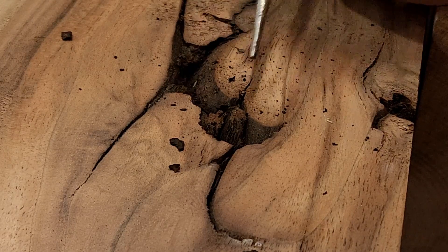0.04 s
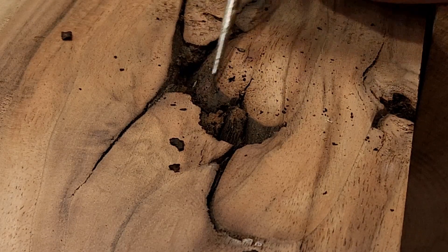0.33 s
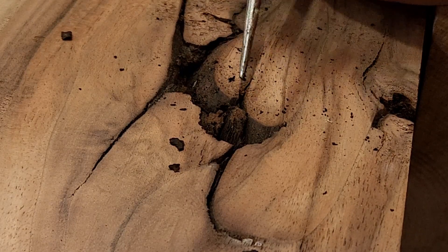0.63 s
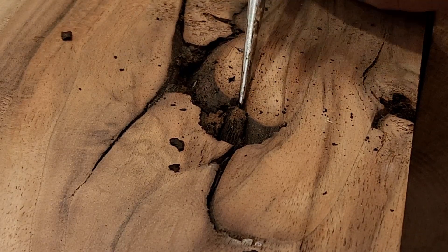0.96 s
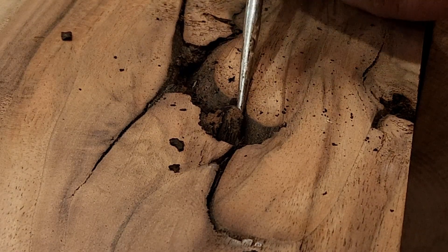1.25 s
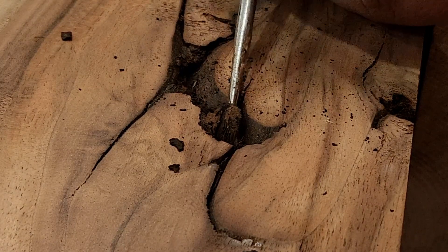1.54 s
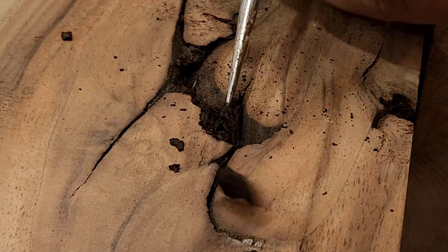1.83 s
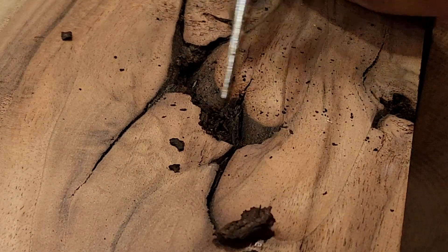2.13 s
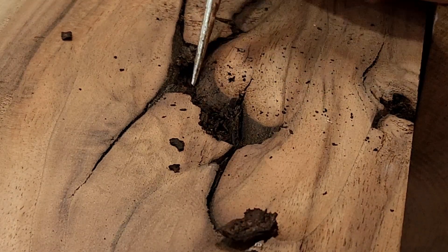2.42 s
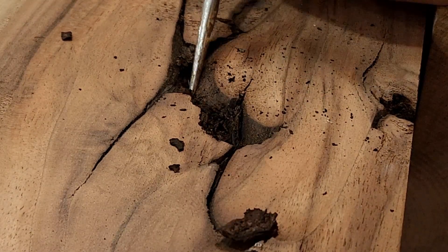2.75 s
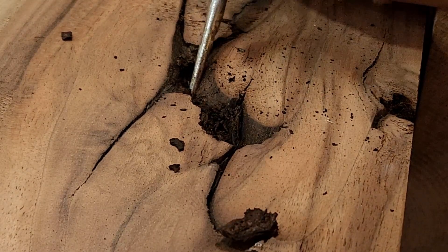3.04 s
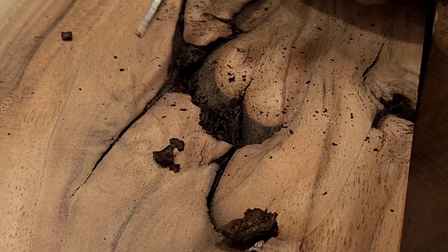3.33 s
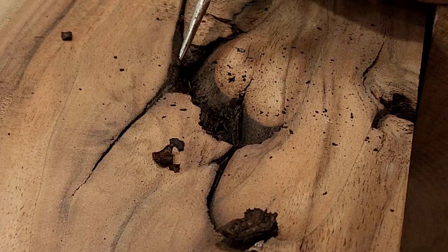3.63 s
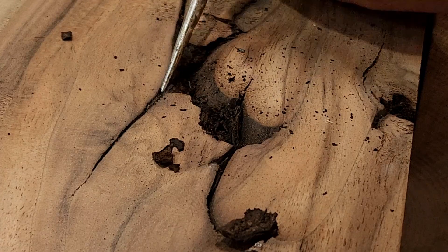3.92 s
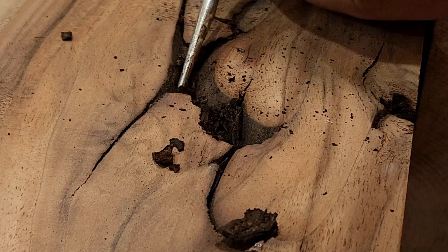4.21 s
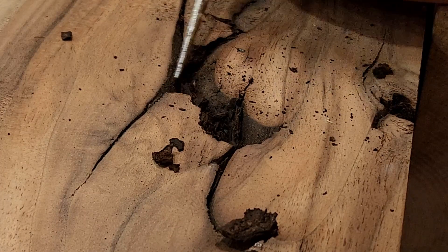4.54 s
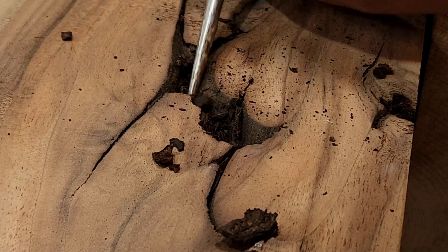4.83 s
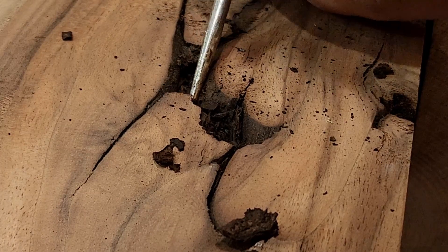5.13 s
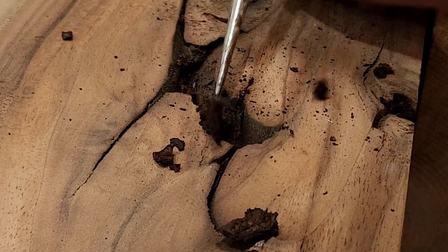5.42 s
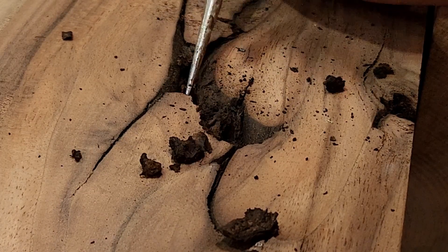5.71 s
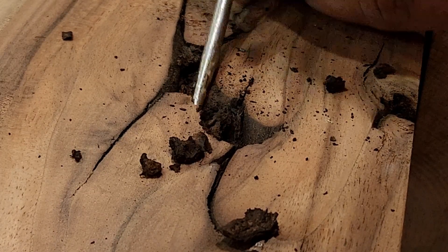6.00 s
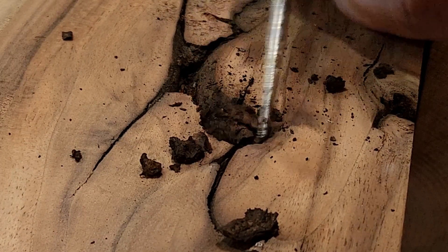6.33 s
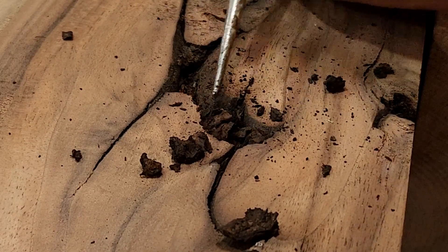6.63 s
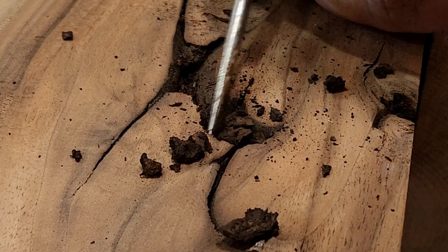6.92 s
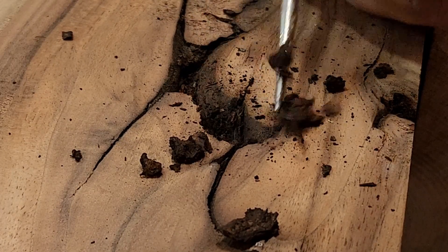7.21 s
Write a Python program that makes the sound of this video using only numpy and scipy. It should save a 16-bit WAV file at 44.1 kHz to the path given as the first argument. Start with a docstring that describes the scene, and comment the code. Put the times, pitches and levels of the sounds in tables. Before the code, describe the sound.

Dry, brittle cracks and faint gritty scraping as a metal point picks bark from wood in a quiet workshop.

```python
"""A small, quiet workshop, where a steel pick pries crumbly bark from a knot hole in a wooden slab.
Each snap is a burst of tiny fractures that excites the resonances of pick and slab; strong ones rock the
slab on its bench. Chips ring, crumbs tick, and the steel clacks and squeaks on sound wood. Between snaps
the point scratches through the bark. A close stereo microphone hears this with the room's reflections."""
import sys
import numpy as np
from scipy import signal
from scipy.fft import rfft, irfft
from scipy.io import wavfile
from scipy.ndimage import uniform_filter1d

SR = 44100
rng = np.random.default_rng(int(sys.argv[2]) if len(sys.argv) > 2 else 0)


def generate_wav(signal):
    """Clip the signal to [-1, 1] and save it as 16-bit WAV at the path in sys.argv[1]."""
    frames = np.transpose(np.atleast_2d(signal))
    scaled = np.clip(frames, -1, 1) * 32767
    pcm = np.round(scaled).astype(np.int16)
    wavfile.write(sys.argv[1], SR, pcm)


N = 324576
HIT_SIZE, ATTACK_SIZE = 16384, 882  # samples in one hit and in its first 20 ms
AGE = np.arange(HIT_SIZE) / SR  # seconds since a hit began

# Bark snapping. Each row: start in seconds, fracture time in seconds, crack level in dB,
# then ring of the pick and fizz, both in dB relative to the crack.
SNAPS = [(.075, 0.0013, -22.5, -10, -6.5), (1.2438, .0008, -36.5, -16, -22.5),
         (1.413, 0.012, -52.5, -2, -15), (1.8164, 0.0027, -32, -1, 2.5), (2.7672, .0026, -56.5, -3, 4.5),
         (3.2177, 0.0039, -29, -5.5, -1), (3.8414, 0.0073, -47, 6, -12),
         (4.0976, 0.00039, -31.5, -3.5, -8.5), (4.1277, .0027, -44, 1.5, -10),
         (4.2454, 0.0017, -21, -8.5, -6.5), (4.392, 0.00088, -62, -1.5, 8), (4.445, 0.0079, -26, 2, -9.5),
         (4.4894, 0.0006, -38.5, 3.5, -10), (5.3553, .001, -54.5, -18, 3.5), (5.3846, .002, -47, -4.5, 4),
         (5.408, 0.0062, -40.5, -11, -4), (5.4224, 0.0013, -36, -4, -4), (5.431, 0.0091, -25, -4, -3),
         (5.478, 0.00085, -25, -10, -3), (5.8463, 0.0068, -40.5, -0.5, -6.5),
         (5.8785, 0.0016, -42, 1.5, -18), (6.083, 0.0049, -36.5, -12.5, 0.5),
         (6.0882, 0.0017, -34, -8, -15), (6.1984, 0.0036, -34, -5, -9.5), (6.33, 0.00027, -50.5, -13, -2),
         (6.384, 0.011, -36, -4.5, 1), (6.4148, .0005, -26.5, -6.5, -5), (6.423, 0.011, -28.5, -1.5, -10.5),
         (7.136, 0.021, -35, -2.5, -9), (7.1727, 0.00033, -43, 4, -2), (7.245, 0.0089, -47, 12, 4.5),
         (7.27, .009, -36, -3, -5.5)]
# Jolts of the slab. Each row: start in seconds, then relative levels of ring, sway and bounce in dB.
JOLTS = [(0.075, -34.5, -35.5, -32), (1.315, -59, -51.5, -34), (1.526, -54.5, -60, -50.5),
         (1.818, -32, -37, -41), (3.219, -31.5, -34.5, -40), (3.844, -45.5, -67.5, -71),
         (4.099, -40, -51, -53), (4.246, -34, -67, -50.5), (4.447, -36.5, -30.5, -32),
         (4.933, -56.5, -43.5, -44.5), (5.434, -40, -35, -37.5), (5.478, -37.5, -28.5, -44),
         (5.848, -47.5, -29.5, -45), (6.195, -49, -39, -50.5), (6.42, -44, -38.5, -37.5),
         (7.269, -44.5, -59.5, -44.5)]
# Steel knocking on sound wood; the row at 1.31 s is instead the sharp click of the slab bumping its bench. Each
# row: start in seconds, level in dB, pitch in Hz, left minus right in dB, click level in dB, roughness from 0
# to 1.
CLACKS = [(0.6214, -37, 1764, -1.5, -42, 0.53), (1.3143, -35, 2100, 2.5, -46.5, .9),
          (1.5262, -42.5, 1428, 5.5, -43.5, 0.55), (3.8439, -38.5, 1410, 11.5, -65.5, 0.3),
          (4.245, -15.5, 1342, 10.5, -42, 0.22)]
# Hard chips breaking free or landing. Each row: start in seconds, level in dB, pitch in Hz.
CHIPS = [(1.8182, -23.5, 4940), (1.832, -39, 4950), (1.9003, -37.5, 3700), (1.978, -42, 3840),
         (3.219, -29, 5400), (4.246, -28.5, 5430), (5.477, -24.5, 5270)]
# Dull bumps of slab and hand. Each row: start in seconds, level in dB, lower and upper band edge in Hz,
# 60 dB decay time in seconds.
BUMPS = [(1.088, -63.5, 985, 1420, 0.086), (1.311, -31.5, 200, 2630, 0.067),
         (1.315, -39.5, 133.6, 865, 0.34), (2.628, -53, 208, 423, 0.33)]
# Drags of the point. Each row: start and length in seconds, grit level in dB, ring in dB above the grit.
STROKES = [(0.593, 0.052, -46.5, -10), (1.12, 0.19, -62.5, -2.5), (2.313, 0.12, -61.5, 3),
           (2.501, 0.048, -49, -21), (2.584, 0.084, -66, 2.5), (2.747, 0.1, -52.5, -2.5),
           (3.045, 0.093, -66, 3.5), (3.145, 0.05, -55, -10), (3.791, 0.076, -56.5, 7),
           (4.346, 0.089, -55.5, -18), (4.743, 0.038, -44, 0.5), (4.828, 0.18, -51.5, -2),
           (5.319, .095, -48.5, -10), (5.965, 0.15, -47, -3.5), (6.14, 0.037, -41.5, -7),
           (6.804, 0.047, -40, -1), (6.846, 0.043, -44, -8), (6.92, 0.098, -45.5, -1),
           (7.037, 0.067, -58, 2.5), (7.203, 0.068, -42.5, 5.5), (7.287, .09, -74, 11)]
# Steel chafing on sound wood. Each row: start and length in seconds, level in dB, pitch in Hz.
SQUEAKS = [(5.781, 0.3, -59, 1783), (5.96, 0.081, -70, 1430), (6.933, 0.27, -54, 1800),
           (7.177, 0.12, -57, 1760)]
# Modes of the slab. Each row: frequency in Hz, level in dB, 60 dB decay time in seconds.
SLAB_MODES = [(176, -14, 0.19), (232, -17, 0.22), (290.6, -6, .14), (340, -16.5, 0.19), (435.5, -9, 0.16),
              (512.7, 2.5, 0.085), (572.3, -7, 0.11), (659, -14, 0.14)]
# Resonances of the firmly braced pick and bending modes of its steel shaft.
# Each row: frequency in Hz, width in Hz, peak height in dB.
BRACED_PEAKS = [(936, 87, 16), (1082, 27, 8), (1202, 81, 11.5), (1454.6, 120, 20.5), (1540, 21, 9)]
SHAFT_PEAKS = [(2980, 390, 6), (3990, 71, 6.5), (5100, 110, -1), (6650, 110, 3)]
# Spectra of the braced pick, cracking bark, fizzing fine fibres, scratched grit, crumbs and room tone.
# Each row: frequency in Hz, relative spectral density in dB.
BRACED_SPECTRUM = [(150, -20), (450, -3), (800, -8.5), (1100, -1), (1500, -3.5), (2100, 3.5), (3000, -23),
                   (8000, -39.5)]
CRACK_SPECTRUM = [(300, -40), (900, -13), (2000, 2.5), (2900, -5.5), (3600, -4), (4500, -1.5), (5500, 3.5),
                  (6600, -4.5), (8000, -14), (10500, -37.5), (16000, -36)]
FIZZ_SPECTRUM = [(2000, -38), (6000, -18), (8300, -7), (10000, -4.5), (12000, -4.5), (15000, -4.5),
                 (17000, -5.5)]
GRIT_SPECTRUM = [(200, -8.5), (600, -34), (1500, -5.5), (2200, -4.5), (3000, 1), (4300, 6.5), (5500, 8),
                 (7000, -3), (9000, -8), (12000, -14), (16000, -11.5)]
CRUMB_SPECTRUM = [(500, -17), (2000, -1.5), (5000, 0), (9000, -6.5), (16000, -10.5)]
ROOM_TONE_SPECTRUM = [(12, -42), (20, -6), (44, -7.5), (113, -23), (193, -33.5), (222, -34), (399, -29),
                      (459, -33), (678, -30.5), (1060, -33), (1910, -32), (2390, -35), (7520, -45.5),
                      (9670, -58), (16000, -51.5)]
# Level difference of the direct sound. Each row: frequency in Hz, left minus right in dB.
LEFT_BIAS = [(40, 4.5), (250, 3), (600, .5), (1300, 4), (2200, 0), (5000, -.5), (9000, 1.5), (14000, 4.5)]
# Reverberation time. Each row: frequency in Hz, 60 dB decay time in seconds.
ROOM_T60 = [(100, 0.85), (400, 0.59), (1400, 0.52), (2700, 0.43), (5500, .3), (10000, 0.22), (16000, 0.19)]
# Colour of the reverberant tail. Each row: frequency in Hz, relative gain in dB.
ROOM_COLOUR = [(60, -13), (250, -2), (600, -7), (1400, -2.5), (2600, -3.5), (4800, -11.5), (15000, 0)]


def snaps(slab_db=-25):
    """Brittle fracture: each burst cracks in the treble, rings the pick and faintly stirs the slab."""
    out = np.zeros((2, N))
    crack, fizz = colour(CRACK_SPECTRUM, SHAFT_PEAKS), colour(FIZZ_SPECTRUM)
    for start, length, crack_db, ring_db, fizz_db in SNAPS:
        burst = fracture(length)
        add(out, start, amp(crack_db + slab_db) * slab_ring(burst))
        for path, relative_db in [(braced_pick(), ring_db), (crack, 0), (fizz, fizz_db)]:
            gain = amp(crack_db + relative_db)
            add(out, start, gain * unit_attack(convolve(burst, path)))
            add(out, start - ATTACK_SIZE / SR, gain * convolve(lead_in(), path / np.linalg.norm(path)))
    return out * panned(db=2.5)


def fracture(length, crumble_db=-21, crumble_s=0.0045, rise_s=0.00066):
    """Acoustic emission: breaking fibres release a tight noise burst and a weaker crumbling."""
    breaking = (1 - np.exp(-AGE / rise_s)) * np.exp(-AGE / max(length, rise_s))
    crumbling = amp(crumble_db) * np.exp(-AGE / crumble_s)
    return stereo_noise(HIT_SIZE, correlation=0.67) * (breaking + crumbling)


def lead_in(level_db=-13, growth_s=0.0089):
    """Exponential onset: a faint 20 ms swell of noise leads into each snap."""
    swell = np.exp(-AGE[:ATTACK_SIZE] / growth_s)[::-1]
    return amp(level_db) * stereo_noise(ATTACK_SIZE, correlation=0.85) * swell


def braced_pick(firmness=0.6, contact_shift=0.05):
    """Boundary conditions: the contact point shifts the pick's resonances; soft bark flattens them."""
    shifts = np.exp(contact_shift * rng.standard_normal(len(BRACED_PEAKS)))
    peaks = [(hz * shift, width, firmness * db) for (hz, width, db), shift in zip(BRACED_PEAKS, shifts)]
    return colour(BRACED_SPECTRUM, peaks)


def slab_ring(burst, roughness=0.75):
    """Modal response: the push excites the slab cleanly, the breaking fibres roughly."""
    slab = modes(SLAB_MODES, spread_db=2, detune=0.0034)
    return unit_attack(unit_attack(slab) + roughness * unit_attack(convolve(burst, slab)))


def jolts(sway_hz=41, bounce_hz=92, sway_t60=0.42, bounce_t60=0.3, rise_s=0.011):
    """Free vibration: the wood rings at once, then slab and bench swing in two low modes and shudder."""
    out = np.zeros((2, N))
    build_up = 1 - np.exp(-AGE / rise_s)
    for start, ring_db, sway_db, bounce_db in JOLTS:
        add(out, start, amp(ring_db) * slab_ring(fracture(length=0.002)) * panned(db=1.95))
        sway = modes([(sway_hz, 0, sway_t60)], spread_db=1, detune=0.029)
        rumble = band(stereo_noise(HIT_SIZE, correlation=0.87), low_hz=53, high_hz=156)
        shudder = unit_rms(rumble) * amp(-60 * AGE / bounce_t60)
        bounce = modes([(bounce_hz, 0, bounce_t60)], spread_db=3, detune=0.033)
        rocking = 2 * amp(sway_db) * sway + amp(bounce_db) * (1.84 * bounce + 0.42 * shudder)
        add(out, start, rocking * build_up * panned(db=1.7))
    return out


def clacks(split=0.085, t60=0.033, rise_s=0.0012, band_ratio=1.57):
    """Beating: two close modes interfere under a brief click; a glancing blow blurs them into noise."""
    out = np.zeros((2, N))
    for start, db, hz, pan_db, click_db, roughness in CLACKS:
        burst = fracture(length=0.0025)
        pair = modes([(hz * (1 - split), 0, t60), (hz * (1 + split), 0, t60)], spread_db=6, detune=0.0061)
        tone = unit_attack(pair * (1 - np.exp(-AGE / rise_s)))
        blur = unit_attack(band(burst, hz / band_ratio, hz * band_ratio))
        knock = unit_attack((1 - roughness) * tone + roughness * blur)
        click = unit_attack(convolve(burst, colour(GRIT_SPECTRUM, SHAFT_PEAKS)))
        add(out, start, (amp(db) * knock + amp(click_db) * click) * panned(pan_db))
    return out


def chips(band_ratio=1.19):
    """Damped resonance: a short fracture excites the broad peak of a small, hard chip."""
    out = np.zeros((2, N))
    for start, db, hz in CHIPS:
        ring = band(fracture(length=0.0018), hz / band_ratio, hz * band_ratio)
        add(out, start, amp(db) * unit_attack(ring))
    return out * panned(db=0.5)


def bumps(rise_s=0.0038):
    """Modal overlap: a soft blow excites so many close modes that they merge into a band of noise."""
    out = np.zeros((2, N))
    for start, db, low_hz, high_hz, t60 in BUMPS:
        envelope = (1 - np.exp(-AGE / rise_s)) * amp(-60 * AGE / t60)
        blow = stereo_noise(HIT_SIZE, correlation=0.66) * envelope
        add(out, start, amp(db) * unit_attack(band(blow, low_hz, high_hz, order=4)))
    return out


def scratching(grains_per_s=900, grain_s=0.00024, rub=0.6, ring_boost_db=1.1):
    """Shot noise: the dragged point breaks a random stream of tiny grains, which excite the pick."""
    levels = np.zeros((2, N))
    for start, length, grit_db, ring_db in STROKES:
        add(levels, start, amp([[grit_db], [grit_db + ring_db + ring_boost_db]]) * pressure(length))
    grit_level, ring_level = levels
    breaks = rng.random(N) < grains_per_s / SR
    sizes_db = 3.5 * np.minimum(rng.exponential(1, N), 3.5)
    grain_envelope = signal.lfilter([1], [1, -np.exp(-1 / (grain_s * SR))], breaks * amp(sizes_db))
    grains = unit_rms(grain_envelope * stereo_noise(N, correlation=0.8))
    drive = (grains + rub * stereo_noise(N, correlation=0.4)) * catching()
    grit = grit_level * unit_rms(convolve(drive, colour(GRIT_SPECTRUM, SHAFT_PEAKS)))
    ring = ring_level * unit_rms(convolve(drive, colour(BRACED_SPECTRUM, BRACED_PEAKS)))
    return (grit + ring) * panned(db=2)


def pressure(length, attack_s=0.039, release_s=0.018, growth_db=0.5):
    """Contact force of a stroke: it builds smoothly, grows slightly, then relaxes exponentially."""
    bite = np.minimum(AGE / attack_s, 1) ** 2
    drag = amp(growth_db * np.minimum(AGE / length, 1))
    release = np.exp(-np.maximum(AGE - length, 0) / release_s)
    return bite * drag * release


def catching(depth_db=4, window=500):
    """Stick-slip friction: the drag swells and sags at random within hundredths of a second."""
    wander = uniform_filter1d(uniform_filter1d(rng.standard_normal(N), window), window // 2)
    return amp(depth_db * unit_rms(wander))


def crumbs(smallest_db=-41, range_db=8, delay_s=0.015, scatter_s=0.041, count=3):
    """Small impacts: loosened crumbs tick on the slab after each snap, in proportion to its crack."""
    out = np.zeros((2, N))
    for start, _, crack_db, _, _ in SNAPS:
        for wait, size in rng.random((count, 2)):
            gain = amp(crack_db + smallest_db + range_db * size)
            add(out, start + delay_s + scatter_s * wait, gain * unit_attack(fracture(length=0.0004)))
    path = colour(CRUMB_SPECTRUM)
    return convolve(out, path / np.linalg.norm(path))


def squeaks(band_ratio=1.083):
    """Frictional excitation: chafing drives one narrow resonance while the pressure lasts."""
    out = np.zeros((2, N))
    for start, length, db, hz in SQUEAKS:
        chafe = band(stereo_noise(HIT_SIZE, correlation=0.8), hz / band_ratio, hz * band_ratio)
        add(out, start, amp(db) * pressure(length) * unit_rms(chafe))
    return out


def direct_sound(work, lag_samples=4.5):
    """Time and level differences: the work lies to the left, so that side is earlier and mostly louder."""
    hz = np.fft.rfftfreq(N, 1 / SR)
    bias_db = along_frequency(LEFT_BIAS, hz)
    left = amp(bias_db / 2)
    right = amp(-bias_db / 2) * np.exp(-2j * np.pi * hz * lag_samples / SR)
    return irfft(rfft(work) * np.array([left, right]), N)


def reflections(work, count=3, cycle_s=0.37):
    """Convolution: room responses cross-fade in a steady cycle, so successive tails differ slightly."""
    phase = np.arange(N) / SR / cycle_s - np.arange(count)[:, None] / count
    shares = np.maximum(np.cos(2 * np.pi * phase), 0)
    shares /= np.linalg.norm(shares, axis=0)  # constant total power
    return sum(convolve(work * share, room_response()) for share in shares)


def room_response(tail_db=-10, early_db=-13, early_t60=0.03, gap_s=0.00033):
    """Reverberation: early reflections off the bench, then a short tail that dies sooner in the treble."""
    age = np.arange(SR // 2) / SR
    onset = np.clip(age / gap_s - 1, 0, 1)
    hz, t, spectra = signal.stft(stereo_noise(len(age), correlation=0.54), SR, nperseg=256)
    decay_db = -60 * t / along_frequency(ROOM_T60, hz)[:, None]
    spectra *= amp(along_frequency(ROOM_COLOUR, hz)[:, None] + decay_db)
    tail = signal.istft(spectra, SR, nperseg=256)[1][:, :len(age)] * onset
    early = stereo_noise(len(age), correlation=0.84) * onset * amp(-60 * age / early_t60)
    return amp(tail_db) * tail / np.linalg.norm(tail[0]) + amp(early_db) * early / np.linalg.norm(early[0])


def room_tone(level_db=-59, coherent_hz=250):
    """Diffuse field: the long waves of a faint rumble reach both sides alike, the soft hiss does not."""
    hz = np.fft.rfftfreq(N, 1 / SR)
    coherence = 1 / (1 + (hz / coherent_hz) ** 2)
    spectra = correlate(rfft(rng.standard_normal((2, N))), coherence)
    air = irfft(spectra * amp(along_frequency(ROOM_TONE_SPECTRUM, hz)), N)
    return amp(level_db) * unit_rms(air) * panned(db=2)


def modes(table, spread_db, detune):
    """Normal modes: damped sines whose balance and pitch vary with the point of contact."""
    hz, db, t60 = np.transpose(table)
    size, shift = rng.standard_normal((2, len(hz)))
    phase = 2 * np.pi * (hz * (1 + detune * shift))[:, None] * AGE
    decay = amp(-60 * AGE / t60[:, None])
    return amp(db + spread_db * size) @ (decay * np.sin(phase))


def colour(spectrum, peaks=()):
    """Minimum phase: the causal impulse response of a spectrum with resonant peaks."""
    hz = abs(np.fft.fftfreq(2048, 1 / SR))
    peaks_db = sum(height / (1 + (2 * (hz - centre) / width) ** 2) for centre, width, height in peaks)
    log_gain = np.log(amp(along_frequency(spectrum, hz) + peaks_db))
    transfer = np.exp(np.conj(signal.hilbert(log_gain)))
    return np.fft.ifft(transfer).real[:len(hz) // 2]


def band(x, low_hz, high_hz, order=2):
    """Band-pass filtering."""
    return signal.sosfilt(signal.butter(order, [low_hz, high_hz], "band", fs=SR, output="sos"), x)


def convolve(x, response):
    """Convolution of each channel, keeping its length."""
    return signal.fftconvolve(np.atleast_2d(x), np.atleast_2d(response), axes=1)[:, :x.shape[-1]]


def stereo_noise(size, correlation):
    """Partly coherent white noise in two channels."""
    return correlate(rng.standard_normal((2, size)), correlation)


def correlate(pair, correlation):
    """Partial coherence: the right channel shares part of the left, at unchanged power."""
    left, other = pair
    return np.array([left, correlation * left + np.sqrt(1 - correlation ** 2) * other])


def panned(db):
    """Constant-power gains, the left exceeding the right by db."""
    gains = amp([[db / 2], [-db / 2]])
    return unit_rms(gains)


def add(mix, start, sound):
    """Superposition of a sound on the mix, at a start in seconds."""
    part = mix[:, round(start * SR):][:, :sound.shape[-1]]
    part += sound[..., :part.shape[1]]


def along_frequency(table, hz):
    """Interpolation of a table along log frequency."""
    table_hz, values = np.transpose(table)
    return np.interp(np.log(hz + 1), np.log(table_hz + 1), values)


def amp(db):
    """Amplitude ratio of a level in decibels."""
    return 10 ** (np.asarray(db) / 20)


def unit_rms(x):
    """Normalisation to rms 1."""
    return x / np.sqrt(np.mean(x ** 2) + 1e-20)


def unit_attack(x):
    """Normalisation of a hit to rms 1 over its first 20 ms."""
    return x / np.sqrt(np.mean(x[..., :ATTACK_SIZE] ** 2) + 1e-20)


def scene():
    """Superposition: the direct sound of the work, its reflections and the room tone."""
    work = snaps() + jolts() + clacks() + chips() + bumps() + scratching() + crumbs() + squeaks()
    return direct_sound(work) + reflections(work) + room_tone()


def record(dry):
    """Clipping and band limiting: peaks stop at full scale, then a low-pass trims the highest treble."""
    low_pass = signal.firwin(511, cutoff=16100, window=("kaiser", 8), fs=SR)
    delay = len(low_pass) // 2
    clipped = np.pad(np.clip(dry, -1, 1), ((0, 0), (0, delay)))
    return convolve(clipped, low_pass)[:, delay:]


dry = scene()
out = record(dry)
generate_wav(out)
```